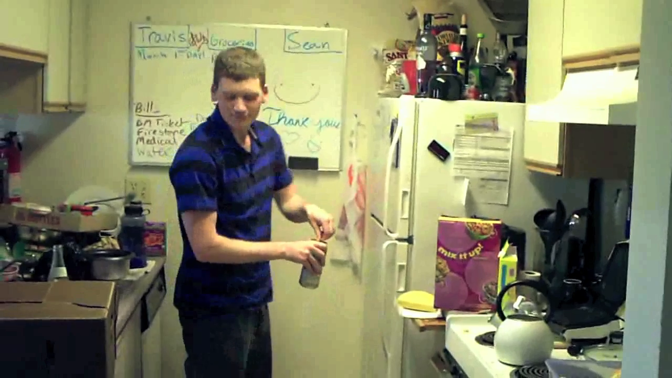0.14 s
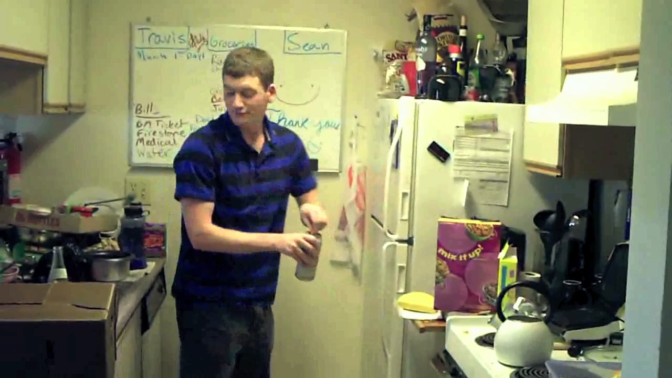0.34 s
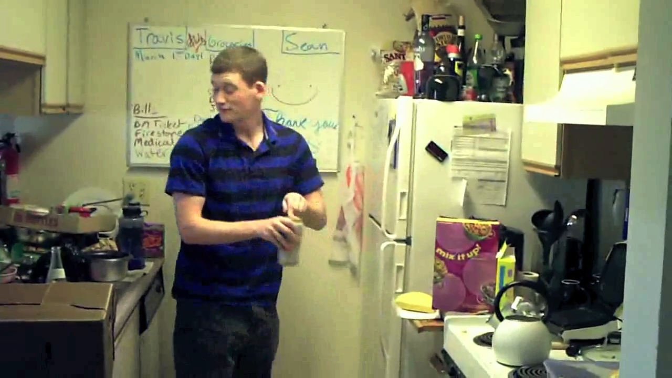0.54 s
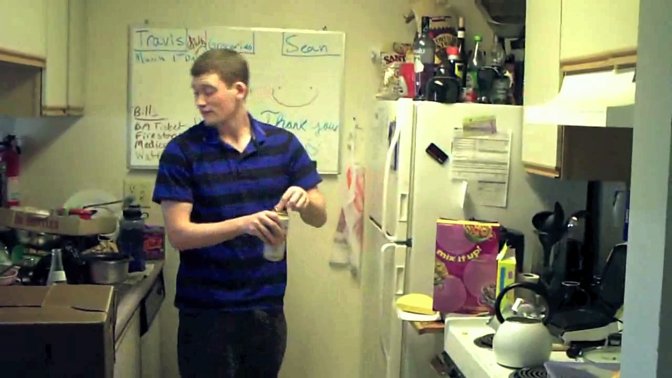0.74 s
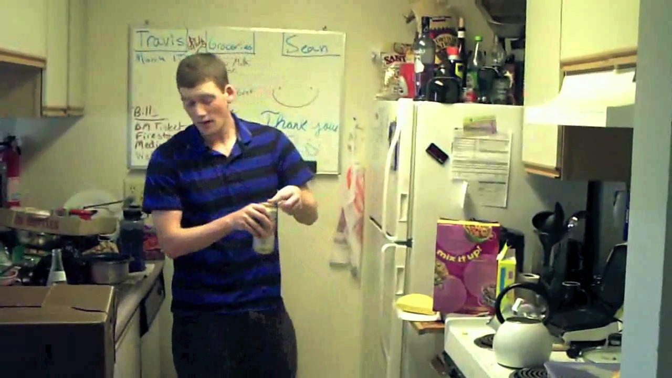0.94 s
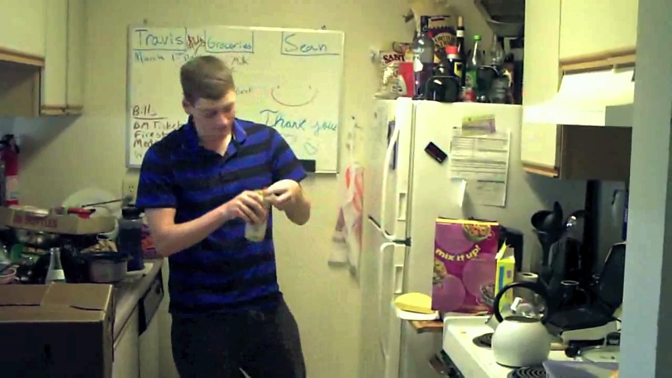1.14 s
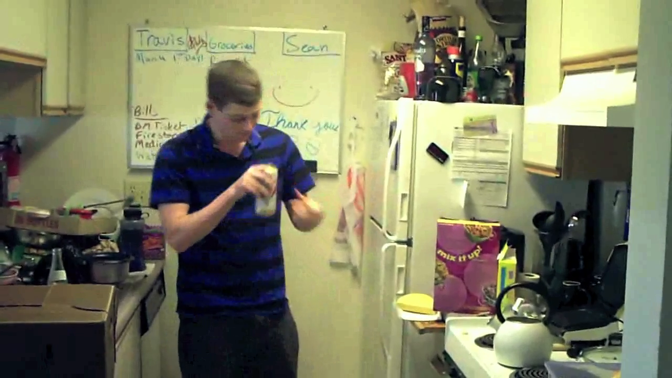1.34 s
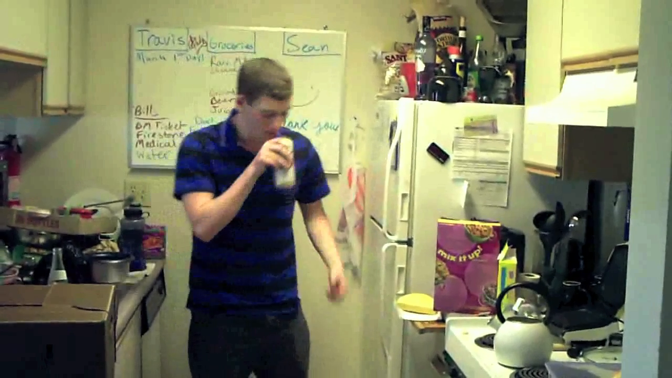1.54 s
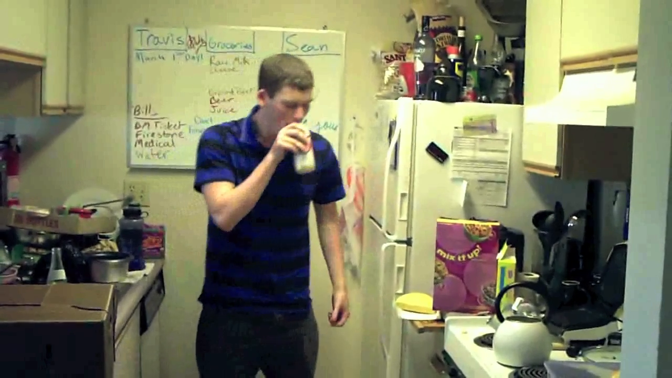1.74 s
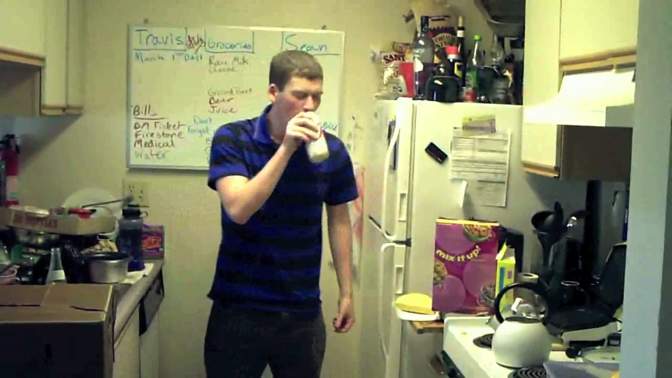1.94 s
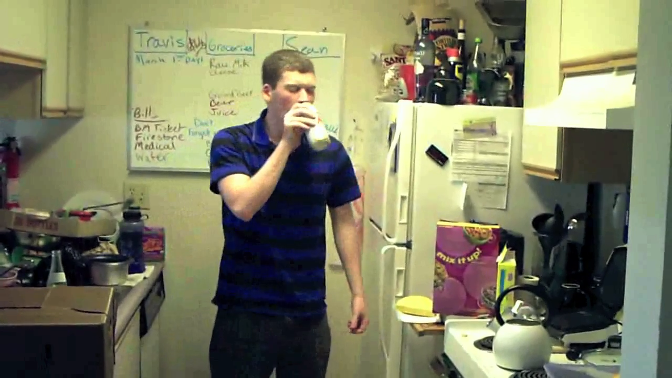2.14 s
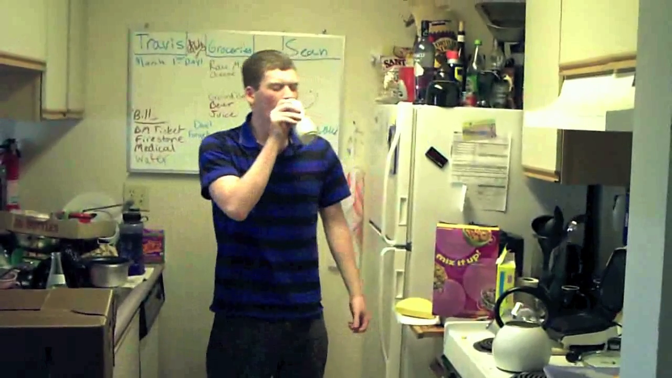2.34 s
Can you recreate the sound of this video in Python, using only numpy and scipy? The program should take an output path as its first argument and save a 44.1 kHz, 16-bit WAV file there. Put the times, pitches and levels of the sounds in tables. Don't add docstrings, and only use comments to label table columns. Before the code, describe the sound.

A drink can is opened: brief tab scrape, loud sharp crack with a tinny ring, faint fizz, then small metal ticks and two footsteps on tiles, over fridge hum in a small kitchen, dull overloaded microphone.

```python
import sys
import numpy as np
from scipy import signal
from scipy.io import wavfile
from scipy.ndimage import uniform_filter1d

SR = 44100
rng = np.random.default_rng(int(sys.argv[2]) if len(sys.argv) > 2 else 0)


def volts(x):
    e = np.asarray(x, float) / 20
    return 10 ** e


def transcribe(signal):
    frames = np.atleast_2d(signal).T
    limited = np.clip(frames, -1, 1)
    pcm = np.round(limited * 32767).astype(np.int16)
    wavfile.write(sys.argv[1], SR, pcm)


N = 110250


def level(x, db):
    return x * volts(db) / np.sqrt(np.mean(x ** 2))


def band(x, hz, width_hz):
    q = max(hz / width_hz, 0.35)
    return signal.lfilter(*signal.iirpeak(min(hz, 18000), q, fs=SR), x)


def double_band(x, hz, width_hz):
    return band(band(x, hz, width_hz), hz, width_hz)


def walk(rate_hz):
    hold = int(SR / rate_hz)
    steps_held = np.repeat(rng.standard_normal(N // hold + 1), hold)
    return 1.7 * uniform_filter1d(uniform_filter1d(steps_held, hold), hold)[:N]


def crackle(spread_db):
    size_db = spread_db * (rng.exponential(size=N) + 0.4 * walk(400))
    return level(rng.standard_normal(N) * volts(size_db), 0)


def gate(start_s, hold_s):
    t = np.arange(N) / SR - start_s
    release_s = 0.0034 + 0.3 * hold_s
    return (t >= 0) * np.exp(-np.clip(t - hold_s, 0, 1) / release_s)


def ring(start_s, hz, t60_s):
    t = np.clip(np.arange(N) / SR - start_s, 0, 9)
    return np.sin(2 * np.pi * hz * t) * np.exp(-np.log(1000) * t / t60_s)


def burst(grit, start_s, hold_s, hz, width_hz):
    snap_db = 13
    x = grit * gate(start_s, hold_s)
    x[int(start_s * SR) + 1] += volts(snap_db)
    return np.sqrt(14000 / width_hz) * double_band(x, hz, 1.32 * width_hz)


def metal_bursts(table):
    grit, out = crackle(1.7), 0
    for k, (start_s, db, hold_s, hz, width_hz) in enumerate(table):
        shifted = np.roll(grit, 999 * k)
        out = out + volts(db) * burst(shifted, start_s, hold_s, hz, width_hz)
    return out


# start in seconds, level in dB, hold in seconds, centre in Hz, width in Hz.
OPENING = [(.0, -49, 0.044, 1490, 5900), (.095, -62.5, .004, 4500, 2950), (.1265, -36, .004, 4500, 1500),
           (0.133, -37, 0.003, 3340, 3090), (.141, -37, 0.036, 3100, 790), (.147, -47, 0.0067, 4600, 1520),
           (.158, -40, 0.028, 3200, 500), (0.173, -37.5, .005, 4700, 3030), (0.178, -38, 0.015, 4450, 1300),
           (.193, -42.5, .014, 4370, 1500), (.209, -7.5, 0.0094, 4250, 4000),
           (.219, -16, 0.0034, 4300, 3500), (.2255, -13, 0.0043, 4400, 2530), (.210, -25.5, .015, 394, 700),
           (.211, -24, 0.031, 1050, 500), (.211, -16.5, .022, 1450, 704), (.236, -27.5, 0.023, 1380, 597),
           (.245, -35, 0.02, 3834, 5000), (0.271, -26, 0.013, 4080, 4030), (0.386, -70, .004, 3000, 4025),
           (.434, -44, 0.0017, 4000, 6100)]


def opening():
    return metal_bursts(OPENING)


# time in seconds, level in dB.
FIZZ_LEVEL = [(0, -41), (.06, -63.5), (.12, -49), (.3, -42), (.45, -53.5), (.55, -69), (.7, -75.5),
              (.85, -66), (.92, -53.5), (1.05, -52.5), (1.2, -64), (1.45, -60), (1.53, -62.5),
              (1.68, -64.5), (1.8, -83), (2.0, -73.5), (2.25, -78), (2.5, -72)]


def fizz():
    s, db = np.array(FIZZ_LEVEL).T
    bubbles = level(band(crackle(3), hz=5000, width_hz=10000), 0)
    return bubbles * volts(np.interp(np.arange(N) / SR, s, db) + 1.5 * walk(22))


# frequency in Hz, density in dB per Hz.
AIR_SPECTRUM = [(20, 4), (45, -23.5), (260, -12), (500, -22), (850, -17.5), (2300, -31.5), (4000, -44),
                (7000, -46)]


def air():
    out, (hz, db) = 0, np.array(AIR_SPECTRUM).T
    for f in 20 * 2 ** np.arange(0, 8.5, 1 / 3):
        gain = volts(np.interp(np.log(f), np.log(hz), db) + 1.7 * walk(14))
        out = out + gain * double_band(rng.standard_normal(N), f, f / 3)
    return level(out, -47)


# frequency in Hz, level in dB, width in Hz.
FRIDGE_TONES = [(56.7, -55.5, 4.5), (112.2, -60.5, 13), (181, -71, 10), (213.2, -58, 12),
                (246.3, -68.5, 12), (308.1, -60, 9), (831, -62.5, 14), (858, -65.5, 35)]


def fridge():
    out = 0
    for hz, db, width_hz in FRIDGE_TONES:
        tone = double_band(rng.standard_normal(N), hz, width_hz)
        out = out + level(tone * volts(2.2 * walk(6.7)), db)
    return out


def whine():
    hz, start_db, fade_db_per_s = 2324, -60.5, 3
    t = np.arange(N) / SR
    phase = 2 * np.pi * hz * t + 0.8 * walk(15)
    return np.sin(phase) * volts(start_db - fade_db_per_s * t + 1.3 * walk(12.59))


# centre in seconds, level in dB, frequency in Hz, length in seconds.
FLOOR_SWAYS = [(.01, -40, 39, 0.08), (0.186, -32.5, 22, .1), (0.782, -31.5, 13.7, 0.078),
               (0.842, -36, 9.7, 0.11), (0.943, -41, 8.7, 0.074), (0.981, -47.5, 48, 0.094),
               (1.417, -37.5, 19, .06), (1.958, -30, 16, .14), (2.047, -37.5, 16.6, .1),
               (2.11, -50, 116, 0.05), (2.208, -34, 60, 0.022), (2.357, -41.5, 21, .14),
               (2.49, -35, 11, .08)]


def floor_sway():
    out = 0
    for centre_s, db, hz, length_s in FLOOR_SWAYS:
        t = np.arange(N) / SR - centre_s
        out = out + volts(db) * np.cos(2 * np.pi * hz * t) * np.exp(-(t / (length_s / 2)) ** 2)
    return out


# frequency in Hz, level in dB, t60 in seconds.
TIN_MODES = [(1114, -3.5, 0.1202), (1494, 0, 0.35), (1547, -9.5, .14), (1578, -3.5, .16), (3933, -3, .16),
             (4214, 8.5, 0.28), (4640, 0.5, .14), (4580, 1.5, .16), (4637, -2.5, 0.068), (4700, -4, .14)]


def tin():
    crack_s, tin_db = 0.209, -27.5
    return sum(volts(tin_db + db) * ring(crack_s, hz, t60_s) for hz, db, t60_s in TIN_MODES)


# start in seconds, level in dB, hold in seconds, centre in Hz, width in Hz.
LATER_TICKS = [(0.57, -46.5, .011, 1500, 920), (0.57, -45.5, 0.038, 290, 500),
               (.585, -57.5, 0.06, 4900, 3040), (0.936, -39.5, 0.012, 3100, 5000),
               (.935, -54, .027, 4270, 180), (.935, -48.5, 0.023, 4860, 150),
               (1.248, -47.5, .024, 1800, 200), (1.358, -34.5, 0.013, 1980, 530),
               (1.282, -40, 0.012, 3840, 2700), (1.32, -50.5, .03, 3200, 920),
               (2.135, -65, 0.015, 3400, 2000), (1.545, -61, 0.011, 5500, 3030),
               (1.63, -59, 0.034, 4450, 2500), (2.26, -56, 0.0043, 3400, 5000),
               (2.1615, -38, 0.0037, 4800, 2700), (2.225, -45, 0.033, 2050, 340),
               (2.164, -40, 0.016, 1980, 400), (2.469, -51, 0.0068, 2090, 590)]


def later_ticks():
    return metal_bursts(LATER_TICKS)


# start in seconds, level in dB, hold in seconds, centre in Hz, thump in dB.
SHOE_KNOCKS = [
    (1.282, -30, 0.0035, 800, -31.5),
    (1.295, -31.5, 0.007, 950, -53.5),
    (1.353, -30, 0.0073, 810, -36),
    (1.361, -40.5, 0.0072, 2390, -41),
    (1.366, -35.5, 0.0036, 950, -43),
    (2.1615, -33.5, 0.0085, 1075, -44),
    (2.174, -36, .016, 493, -34.5),
    (2.195, -53, 0.018, 300, -37.5),
]


def steps():
    width_hz, grit_db = 800, -18
    thump_hz, thump_t60_s = (58.3, 106, 261.6), 0.13
    grit, out = crackle(1.45), 0
    for k, (start_s, db, hold_s, hz, thump_db) in enumerate(SHOE_KNOCKS):
        knock = burst(np.roll(grit, 777 * k), start_s, hold_s, hz, width_hz)
        out = out + volts(db) * (knock + volts(grit_db) * grit * gate(start_s, hold_s))
        for f in thump_hz:
            out = out - volts(thump_db) * ring(start_s, f, thump_t60_s * np.sqrt(thump_hz[0] / f))
    return out


# band centre in Hz, t60 in seconds.
ROOM_DECAY = [(150, .3), (400, .27), (900, .25), (2000, .23), (4500, .27), (7000, .22)]


def room(x, wet_db):
    predelay_s = 0.0026
    t, tail = np.arange(SR // 2) / SR, 0
    for hz, t60_s in ROOM_DECAY:
        noise = band(rng.standard_normal(len(t)), hz, 1.3 * hz)
        tail = tail + noise * np.exp(-np.log(1000) * t / t60_s) / np.sqrt(hz)
    tail = signal.lfilter([1, -0.9], [1], tail) * (t > predelay_s)
    tail = tail / np.sqrt(np.sum(tail ** 2))
    return x + volts(wet_db) * signal.fftconvolve(x, tail)[:N]


def scene():
    hits = room(opening() + tin(), wet_db=-6.5)
    hits = hits + room(later_ticks(), wet_db=-7.5) + room(steps(), wet_db=0.5)
    kitchen = air() + fridge() + whine() + floor_sway()
    return (hits + fizz() + kitchen)[None]


def roll_off(x):
    return signal.sosfilt(signal.butter(12, 16660, fs=SR, output="sos"), x)


def record(dry):
    clip = 0.66
    x = dry + volts(13) * band(dry, hz=4568, width_hz=393)
    x = signal.sosfilt(signal.butter(2, 5200, fs=SR, output="sos"), x)
    x = signal.sosfilt(signal.ellip(8, 0.5, 80, 6400, fs=SR, output="sos"), x)
    x = np.clip(x, -clip, clip)
    x = signal.sosfiltfilt(signal.butter(10, 15900, fs=SR, output="sos"), x)
    return roll_off(x)


dry = scene()
out = record(dry)
transcribe(out)
```